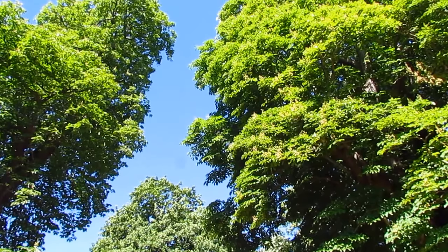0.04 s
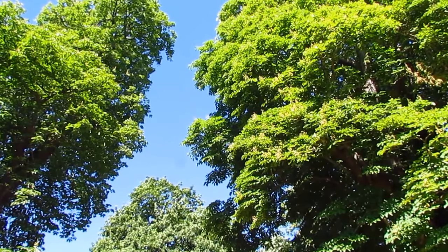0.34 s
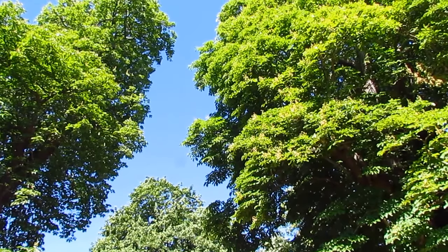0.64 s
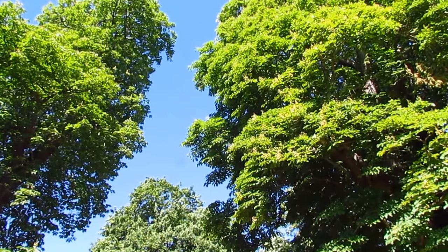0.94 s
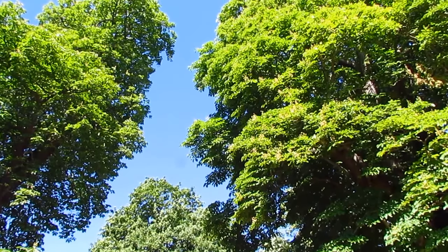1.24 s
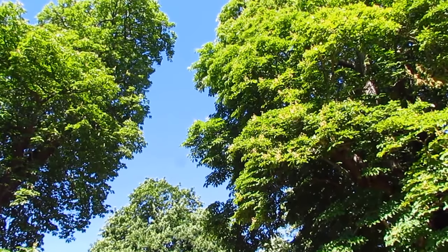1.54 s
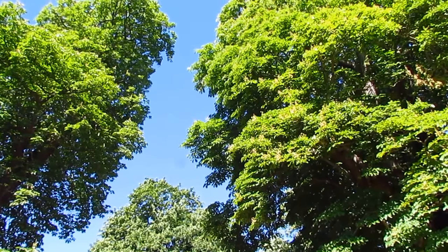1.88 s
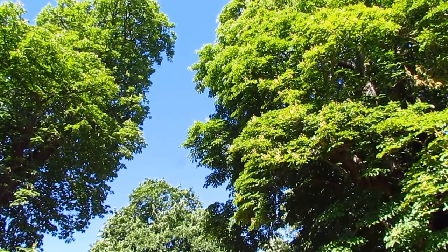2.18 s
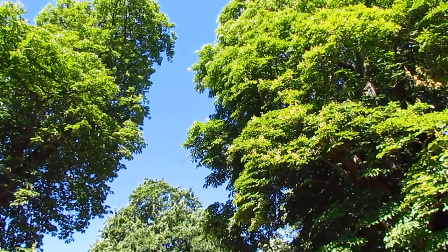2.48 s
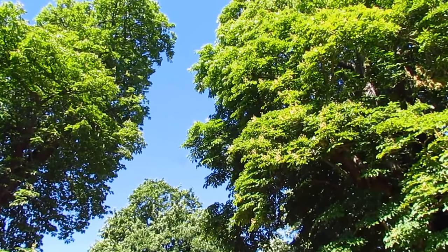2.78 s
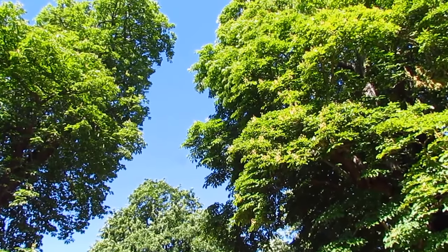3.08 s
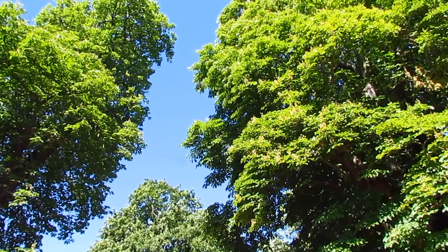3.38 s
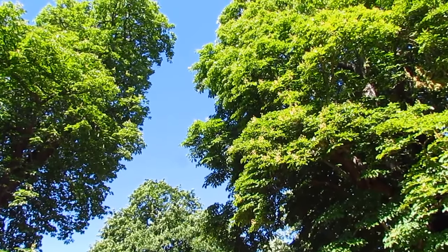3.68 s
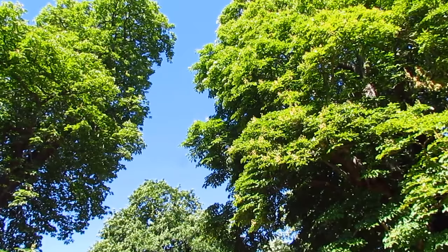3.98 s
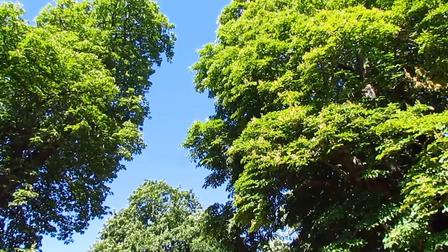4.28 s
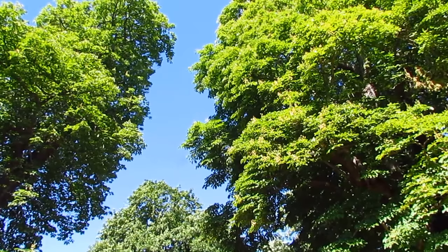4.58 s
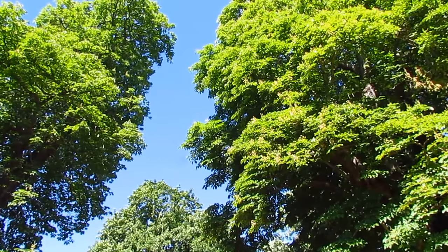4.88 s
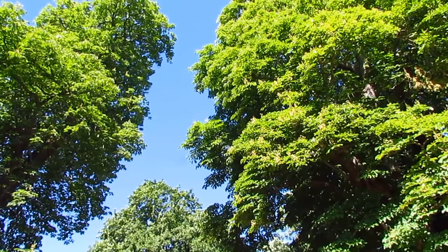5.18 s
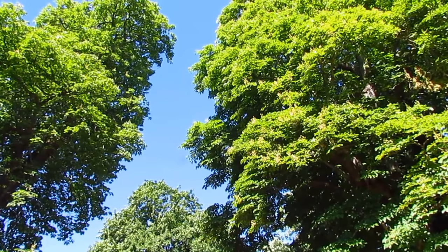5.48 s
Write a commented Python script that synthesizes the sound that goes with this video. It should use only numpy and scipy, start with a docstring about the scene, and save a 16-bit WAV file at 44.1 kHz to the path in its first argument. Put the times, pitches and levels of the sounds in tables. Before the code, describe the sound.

A small songbird sings a fast, high phrase of ticks, tweets and falling slurs in the trees, over faint traffic and leaf hiss.

```python
"""Sharp ticks open a warbler's falling phrase, joined by arched tweets and long slurs. Each note is a
frequency-modulated tone of the syrinx, scattered by tall trees that return two echoes. A lower chirp cuts in
once, and a second bird sings farther off. Beneath them lie the filtered noise of distant traffic, one passing
car, a faint engine hum and hissing leaves; three soft rustles come at the end."""
import sys
import numpy as np
from scipy import signal
from scipy.fft import rfft, irfft
from scipy.io import wavfile
from scipy.ndimage import uniform_filter1d

SR = 44100
rng = np.random.default_rng(int(sys.argv[2]) if len(sys.argv) > 2 else 0)


def int16_out(signal):
    """Quantize to a 16-bit WAV file."""
    q = np.round(np.clip(np.atleast_2d(signal).T, -1, 1) * 32767)
    wavfile.write(sys.argv[1], SR, q.astype(np.int16))


N = 243873
T, HZ = np.arange(N) / SR, np.fft.rfftfreq(N, 1 / SR)
SIDES = np.array([[.5], [-.5]])  # splits a level difference between left and right


def gain_of(db):
    """Amplitude ratio: a factor of ten per 20 dB."""
    return 10 ** (np.asarray(db) / 20)


def unit_rms(x):
    """Normalisation to unit mean power."""
    return x / np.sqrt(np.mean(x ** 2) + 1e-20)


def filtered(x, response):
    """Linear filtering: the spectrum is multiplied by a frequency response."""
    return irfft(rfft(x) * response, N)


def spectral_curve(points):
    """Interpolation of (frequency, value) points on a logarithmic frequency axis."""
    hz, value = np.transpose(points)
    return np.interp(np.log(HZ + 1), np.log(hz + 1), value)


def drift(bandwidth_hz):
    """Random modulation: low-pass Gaussian noise of unit rms."""
    hz = np.fft.rfftfreq(2 ** 14, T[-1] / 2 ** 14)
    slow = irfft(rfft(rng.standard_normal(2 ** 14)) * np.exp(-(hz / bandwidth_hz) ** 2))
    return unit_rms(np.interp(T, np.linspace(0, T[-1], len(slow)), slow))


# ambient spectrum: (frequency [Hz], relative spectral density [dB])
AMBIENT_SPECTRUM = [(12, -46), (20, -15.5), (76, -3.5), (109, -9.5), (180, -6), (225, -6.5), (259, -6.5),
                    (427, -6.5), (549, -2.5), (834, -1), (1870, -10), (4550, -8.5), (6020, -10.5),
                    (10200, -15), (15500, -32.5)]
# likeness of left and right: (frequency [Hz], coherence [0-1])
COHERENCE = [(25, 0.96), (80, 0.86), (250, 0.84), (550, 0.86), (1000, 0.68), (2000, 0.26), (4000, 0.25),
             (8000, 0.26), (15000, 0.079)]
# stereo balance: (frequency [Hz], left minus right [dB])
BALANCE = [(60, 1), (240, 0.5), (950, 0), (3770, 2), (15000, 2.5)]
# humps of the tyre roar: (centre [Hz], width [Hz], boost [dB])
TYRE_HUMPS = [(565, 16, 3), (1015, 120, 3)]
def ambient_bands(crossover_hz=1900, right_lag_s=6e-5):
    """A partially coherent noise field, divided into a low and a high band."""
    left, independent = rfft(rng.standard_normal((2, N)))
    coherence = np.clip(spectral_curve(COHERENCE), 0, 1)
    right = coherence * left * np.exp(-2j * np.pi * HZ * right_lag_s)
    right += np.sqrt(1 - coherence ** 2) * independent
    humps_db = sum(db * np.exp(-((HZ - hz) / width) ** 2) for hz, width, db in TYRE_HUMPS)
    colour_db = spectral_curve(AMBIENT_SPECTRUM) + humps_db + spectral_curve(BALANCE) * SIDES
    spectrum = np.array([left, right]) * gain_of(colour_db)
    low_pass = 1 / (1 + (HZ / crossover_hz) ** 6)
    return irfft(spectrum * low_pass, N), irfft(spectrum * (1 - low_pass), N)


# slow swell: (time [s], relative traffic level [dB], relative leaf level [dB])
SWELL = [(0, -45, 0.5), (1.2, -45, 1.5), (2.401, -46, 1.05), (3.199, -45, 0.5), (3.7, -45, 0),
         (4.6, -44, -0.5), (5.1, -44, -1), (5.53, -45, 0.5)]
def traffic_and_leaves():
    """Amplitude-modulated noise: distant traffic swells in the low band, leaves hiss in the high."""
    low, high = ambient_bands()
    times, traffic_db, leaves_db = np.transpose(SWELL)
    traffic = unit_rms(low) * gain_of(np.interp(T, times, traffic_db) + 3 + 0.24 * drift(7.9))
    leaves = unit_rms(high) * gain_of(np.interp(T, times, leaves_db) - 44 + 0.65 * drift(15))
    return traffic + leaves


def engine_hum(hz=87.3, db=-58.5):
    """A far engine's drone: a sinusoid under random frequency and amplitude modulation."""
    phase = 2 * np.pi * np.cumsum(hz + 4.8 * drift(7.9)) / SR
    return gain_of(db) * unit_rms(np.sin(phase) * gain_of(1.6 * drift(8)))


def passing_car(centre_hz=930, width_hz=230, peak_s=4.62):
    """Narrow-band tyre noise swells and fades under a Gaussian envelope."""
    common, *own = rng.standard_normal((3, N))
    band = np.exp(-((HZ - centre_hz) / width_hz) ** 2)
    tyres = unit_rms(filtered(common + .5 * np.array(own), band))
    return gain_of(-47.5) * np.exp(-((T - peak_s) / 0.4) ** 2) * tyres


# soft rustles: (peak time [s], level [dB], rise [s], decay [s], centre [Hz], width [octaves])
RUSTLES = [(5.415, -35, 0.0018, .005, 5670, 0.71), (5.459, -36.5, 0.0075, 0.017, 8800, 0.32),
           (5.49, -46.5, .02, .08, 8050, 0.45)]
def rustles():
    """Bursts of high band-pass noise, made grainy by fast random amplitude modulation."""
    octaves, out = np.log2(HZ + 1), np.zeros((2, N))
    for peak_s, db, rise, decay, hz, width in RUSTLES:
        band = np.exp(-.5 * ((octaves - np.log2(hz)) / width) ** 2)
        noise = unit_rms(filtered(rng.standard_normal((2, N)), band))
        envelope = np.exp(-np.maximum((peak_s - T) / rise, (T - peak_s) / decay))
        out += gain_of(db + 2.4 * drift(600)) * envelope * noise
    return out


def foliage_loss(x, db_per_octave, carry_hz=3750):
    """Frequency-dependent attenuation: foliage favours a band around the pitch that carries best."""
    octaves = abs(np.log2(np.clip(HZ, 2900, 12000) / carry_hz))
    return filtered(x, gain_of(-db_per_octave * octaves))


def scatter(x, envelope, shared):
    """Diffuse scattering: convolution with random reflections of unit energy, partly shared in stereo."""
    common, *own = rng.standard_normal((3, len(envelope)))
    taps = (np.sqrt(shared) * common + np.sqrt(1 - shared) * np.array(own)) * envelope
    taps /= np.linalg.norm(taps, axis=1, keepdims=True)
    return signal.oaconvolve(x[None], taps, axes=1)[:, :N]


# tree-crown echoes: (delay [s], relative level [dB], foliage loss [dB/octave], smear [s])
ECHOES = [(.069, -4.5, 13, 0.0026), (0.0877, -2, 16, 0.002)]
def trees(x, left_db, right_lag_s, leaves_db, leaves_t60, tail_db, tail_t60, echo_db, wet_left_db):
    """Multipath propagation: direct sound, early leaf scatter, a duller reverberant tail and two echoes."""
    t = T[:SR // 2]
    early = (1 - np.exp(-t / 0.0011)) * gain_of(-60 * t / leaves_t60)
    tail = (1 - np.exp(-t / 0.036)) * gain_of(-60 * t / tail_t60)
    wet = gain_of(leaves_db) * scatter(x, early, shared=0.34)
    wet += gain_of(tail_db) * scatter(foliage_loss(x, db_per_octave=7.5), tail, shared=0.11)
    for delay, db, loss, smear in ECHOES:
        echo = 0.63 * gain_of(db + echo_db) * foliage_loss(x, loss)
        wet += np.pad(echo, (round(delay * SR), 0))[:N]
        wet += scatter(echo, np.exp(-abs(t - delay) / smear), shared=0.4)
    direct = np.array([x, filtered(x, np.exp(-2j * np.pi * HZ * right_lag_s))])
    return direct * gain_of(left_db * SIDES) + wet * gain_of(wet_left_db * SIDES)


def syrinx(contours, octave_db, third_db, throat_hz, throat_width_hz, jitter, flutter_db,
           trill_depth=0, trill_hz=100):
    """A modulated oscillator with weak harmonics follows each (time [s], pitch [Hz], level [dB]) contour."""
    waver = 1 + jitter * drift(375) + trill_depth * np.sin(2 * np.pi * trill_hz * T)
    level_drift_db, harmonic_drift_db = flutter_db * drift(180), 2.6 * drift(76)
    out = np.zeros(N)
    for (times, hz, db), second_db in zip(contours, np.broadcast_to(octave_db, len(contours))):
        on = np.flatnonzero((T >= times[0]) & (T <= times[-1]))
        t = T[on]
        pitch = uniform_filter1d(np.interp(t, times, hz), size=70) * waver[on]  # muscles round each corner
        phase = 2 * np.pi * np.cumsum(pitch) / SR
        ramps = np.minimum(np.minimum(t - times[0], times[-1] - t) / .0012, 1)
        level = ramps * gain_of(np.interp(t, times, db) + level_drift_db[on])
        # the octave is strongest where it crosses the throat's upper resonance
        detuning = (2 * pitch - throat_hz) / throat_width_hz
        octave = gain_of(second_db + harmonic_drift_db[on]) / (1 + detuning ** 2) * np.sin(2 * phase)
        third = gain_of(third_db + harmonic_drift_db[on]) * (3 * pitch < SR / 2) * np.sin(3 * phase)
        out[on] += np.sqrt(2) * level * (np.sin(phase) + octave + third)
    return out


def glide(start, length, from_hz, to_hz, db, bend, end_drop_db):
    """A power-law frequency sweep; a bend under 1 moves early, over 1 late."""
    u = np.linspace(0, 1, 100)
    hz = from_hz + (to_hz - from_hz) * u ** bend
    return start + u * length, hz, db - end_drop_db * (2 * u - 1) ** 2


# clear glides: (onset [s], duration [s], from [Hz], to [Hz], relative level [dB], bend [exponent])
FAR_GLIDES = [(3.681, 0.032, 4400, 3090, -51.5, 0.93), (3.898, 0.033, 4650, 2930, -46.5, .8),
              (3.945, .03, 6100, 5150, -57, 1), (4.092, 0.024, 6100, 4870, -52, 1),
              (4.116, 0.045, 4600, 2960, -47.5, 1.08), (4.237, 0.041, 6000, 4650, -49, 2),
              (4.274, 0.097, 4200, 3010, -54, .9), (4.392, 0.051, 5950, 4780, -50.5, 1.5),
              (4.49, 0.045, 6200, 5500, -50, 1.3), (4.555, 0.062, 3950, 5490, -49, 1.56),
              (4.63, 0.089, 5510, 4720, -54, 0.98), (4.728, .095, 4310, 3290, -52, 1.17),
              (4.929, 0.0367, 3800, 4550, -50, 1.26), (4.962, .018, 4500, 3400, -51, 0.71),
              (5.069, .035, 3780, 4360, -53, 1.32), (5.103, .017, 4200, 3200, -53, 1),
              (5.18, 0.082, 3800, 4460, -51.5, 1.9), (5.33, 0.079, 3106, 2960, -52, 1.03)]
# high buzzes: (onset [s], duration [s], from [Hz], to [Hz], relative level [dB])
FAR_BUZZES = [(3.125, 0.11, 5100, 4520, -44), (3.348, 0.25, 7300, 6440, -53),
              (4.265, .115, 7000, 6330, -37), (4.421, .09, 6780, 6120, -36), (4.592, .11, 6720, 5900, -47)]
def far_bird():
    """Reverberation half hides a distant singer; rapid frequency modulation makes its high notes buzz."""
    throat = dict(octave_db=-32, third_db=-50, throat_hz=9800, throat_width_hz=1200)
    clear = [glide(*row, end_drop_db=0.5) for row in FAR_GLIDES]
    buzzy = [glide(*row, bend=0.87, end_drop_db=12.5) for row in FAR_BUZZES]
    glides = syrinx(clear, **throat, jitter=.017, flutter_db=3.5)
    buzzes = syrinx(buzzy, **throat, jitter=0.0205, flutter_db=3.5, trill_depth=0.047, trill_hz=121.7)
    voice = gain_of(-2) * glides + gain_of(-11) * buzzes
    return trees(voice, left_db=10, right_lag_s=2e-5, leaves_db=0, leaves_t60=0.47,
                 tail_db=2, tail_t60=0.81, echo_db=-15, wet_left_db=4.5)


# the chirp's notes: (onset [s], duration [s], from [Hz], to [Hz], relative level [dB])
CHIRP_NOTES = [(0.62, 0.018, 1445, 995, -34), (0.645, 0.0123, 1480, 980, -36),
               (0.655, 0.048, 1645, 1170, -40.5)]
def low_chirp():
    """Three downward sweeps with stronger harmonics fuse into one short, lower bird call."""
    notes = [glide(*row, bend=.9, end_drop_db=-1) for row in CHIRP_NOTES]
    voice = syrinx(notes, octave_db=-18, third_db=-16, throat_hz=2420, throat_width_hz=1200,
                   jitter=0.019, flutter_db=3)
    return trees(gain_of(-1) * voice, left_db=4, right_lag_s=1e-5, leaves_db=-5, leaves_t60=0.14,
                 tail_db=-15, tail_t60=.6, echo_db=-5, wet_left_db=2)


def range_loss_db(hz, slack_hz=5450, strain_hz=6200):
    """Vocal efficiency falls outside the warbler's easy range: it slackens below and thins above."""
    above_khz, below_khz = np.maximum([hz - strain_hz, slack_hz - hz], 0) / 1000
    return 2 * above_khz + 3.5 * below_khz


# arched tweets: (onset [s], duration [s], lift [Hz], top [Hz], end [Hz], relative level [dB])
TWEETS = [(0.151, 0.048, 700, 6880, 5720, -22), (0.196, 0.018, 350, 6400, 6250, -21),
          (0.224, 0.019, 1090, 7050, 6930, -21), (0.251, 0.02, 200, 6450, 6000, -20.5),
          (0.397, 0.036, 754, 6980, 5745, -18.5), (.44, 0.018, 302, 6220, 6150, -21.5),
          (0.462, .055, 1170, 7550, 5880, -23), (0.792, .036, 650, 6800, 5580, -21),
          (.833, .023, 400, 6420, 6300, -24.5), (1.188, 0.019, 805, 5780, 5340, -27),
          (1.418, 0.018, 740, 5800, 5230, -29.5)]
def tweets(lift_hz_per_s=92400, settled_share=.65, swell_db=13, fade_db=17):
    """Arched frequency modulation: the pitch lifts on a quarter sine and settles on a half cosine."""
    u = np.linspace(0, 1, 100)
    for start, length, lift_hz, top_hz, end_hz, db in TWEETS:
        crest = lift_hz / lift_hz_per_s / length
        lift_left = 1 - np.sin(np.pi / 2 * np.minimum(u / crest, 1))
        fall = .5 - .5 * np.cos(np.pi * np.clip((u - crest) / max(settled_share - crest, .25), 0, 1))
        hz = top_hz - lift_hz * lift_left - (top_hz - end_hz) * fall
        taper_db = np.where(u < .5, swell_db * (2 * u - 1) ** 2, fade_db * (2 * u - 1) ** 4)
        yield start + u * length, hz, db - taper_db - range_loss_db(hz)


# sharp ticks: (onset [s], duration [s], top [Hz], low [Hz], drop time [s], relative level [dB])
TICKS = [(0, 0.011, 7620, 6020, .007, -20.5), (0.023, 0.016, 8000, 5840, 0.013, -27.5),
         (0.632, 0.017, 7430, 6130, 0.0078, -29), (1.177, 0.013, 7800, 4700, 0.0099, -28),
         (1.204, 0.02, 7770, 6630, 0.0075, -21.5), (1.411, .011, 8600, 4700, 0.0083, -27),
         (1.435, 0.021, 8660, 6590, 0.0068, -23.5), (1.627, 0.015, 7800, 6400, 0.013, -34),
         (1.836, 0.019, 7820, 5710, 0.0078, -23.5), (1.856, 0.011, 10180, 5030, 0.014, -20.5),
         (1.955, .009, 8000, 6300, .012, -27), (1.963, 0.014, 8530, 5950, .012, -26),
         (1.999, 0.013, 9900, 4610, 0.018, -23.5)]
def ticks(bend=1.5, swell_db=7.5, attack_s=0.0059):
    """A very fast sweep is heard as a tick: the pitch drops, easing toward a held low note."""
    for start, length, top_hz, low_hz, drop_s, db in TICKS:
        t = np.arange(0, length, 1 / SR)
        hz = low_hz + (top_hz - low_hz) * np.maximum(1 - t / drop_s, 0) ** bend
        yield start + t, hz, db - swell_db * np.exp(-t / attack_s) - range_loss_db(hz)


# long slurs: (time of top [s], lead-in [s], duration from top [s], top [Hz], shelf [Hz], relaxation [s],
# shoulder [exponent], hook [Hz], relative level [dB], fade [dB], octave re fundamental [dB])
SLURS = [(.296, 0.0054, 0.045, 5350, 3960, .0185, 0.86, -120, -22, 3, -24.5),
         (0.537, .007, 0.051, 5380, 3950, .021, 0.89, -100, -26, -0.5, -27),
         (0.65, .007, 0.08, 7260, 4440, .038, 1.7, -140, -22.5, 3, -26),
         (.864, 0.0084, 0.099, 7560, 4410, .036, 1.9, 2306, -21, 3, -30),
         (1.048, .014, .094, 7110, 4350, 0.018, 1, 2447, -24, 0, -27.5),
         (1.227, .003, 0.11, 7270, 4340, 0.032, 1, -480, -19.5, 11, -36),
         (1.461, .003, 0.11, 7340, 4250, .029, 1.05, -460, -22, 7.5, -33),
         (1.651, .005, .131, 7000, 4550, .026, 1.46, -380, -25, 1, -23),
         (1.868, .002, 0.05, 5020, 4220, 0.027, 2.4, -750, -20, 11.5, -31),
         (2.017, .001, 0.11, 7700, 4480, .011, .85, -550, -25, 4, -21.5)]
def slurs(lead_hz_per_s=150000, sag_hz_per_s=8000, hook_hz_per_s=52000, swell_db=14, attack_s=0.004):
    """Exponential relaxation: the pitch leaps up, sinks to a sagging shelf and ends in a hook, up or down."""
    for top_s, lead, length, top_hz, shelf_hz, relax_s, shoulder, hook_hz, db, fade_db, _ in SLURS:
        t = np.arange(-lead, length, 1 / SR)
        before, after = np.maximum(-t, 0), np.maximum(t, 0)
        hz = shelf_hz - sag_hz_per_s * after + (top_hz - shelf_hz) * np.exp(-(after / relax_s) ** shoulder)
        hz -= lead_hz_per_s * before ** 2 / lead
        hz += hook_hz * np.maximum(1 - (length - t) * hook_hz_per_s / abs(hook_hz), 0) ** 1.5
        level_db = db - swell_db * np.exp(-(t + lead) / attack_s) - fade_db * after / length
        yield top_s + t, hz, level_db - range_loss_db(hz)


def warbler():
    """Near-pure tweets and ticks, rougher slurs; a level difference sets the singer a little to the left."""
    throat = dict(third_db=-42, throat_hz=9920, throat_width_hz=2200)
    voice = syrinx([*tweets(), *ticks()], octave_db=-37, **throat, jitter=0.0067, flutter_db=0.9)
    voice += syrinx([*slurs()], octave_db=[row[-1] for row in SLURS], **throat, jitter=0.013, flutter_db=2)
    return trees(gain_of(-0.5) * voice, left_db=3, right_lag_s=1.4e-5, leaves_db=-3.8, leaves_t60=0.18,
                 tail_db=-5.5, tail_t60=0.69, echo_db=0, wet_left_db=3)


def scene():
    """Superposition: the pressures of the birds and the background add."""
    birds = warbler() + far_bird() + low_chirp()
    return birds + traffic_and_leaves() + passing_car() + engine_hum() + rustles()


def record(dry):
    """Band limiting by a linear-phase low-pass filter."""
    low_pass = signal.firwin(1023, cutoff=15650, window=("kaiser", 9), fs=SR)
    return signal.oaconvolve(dry, low_pass[None], "same", axes=1)


dry = scene()
out = record(dry)
int16_out(out)
```